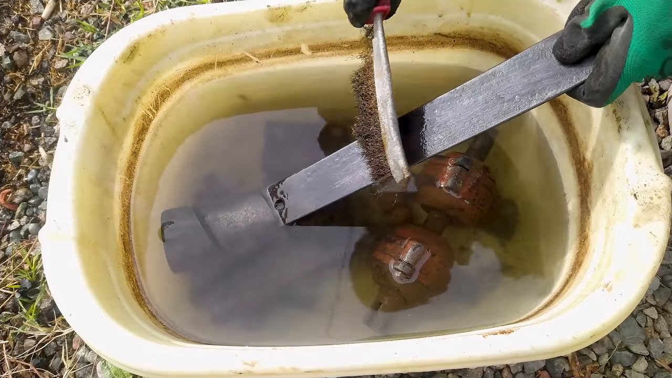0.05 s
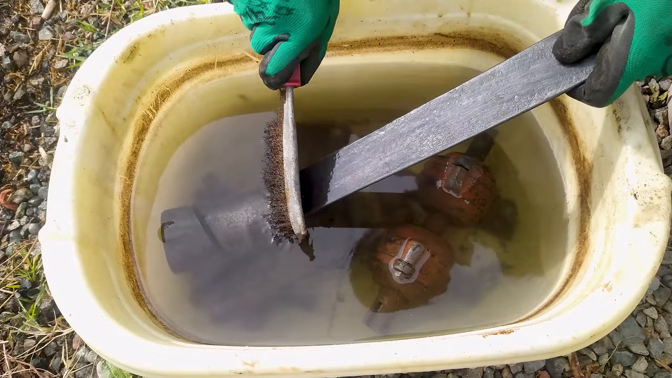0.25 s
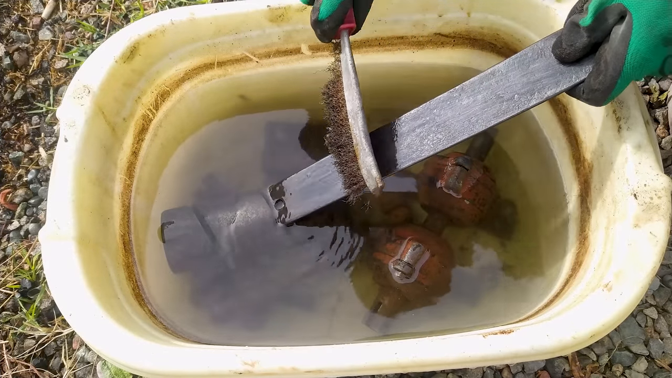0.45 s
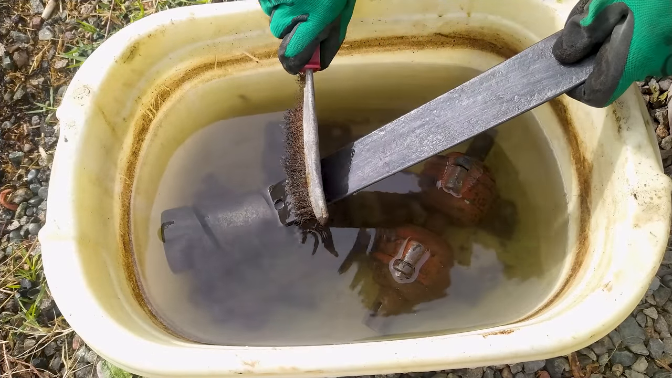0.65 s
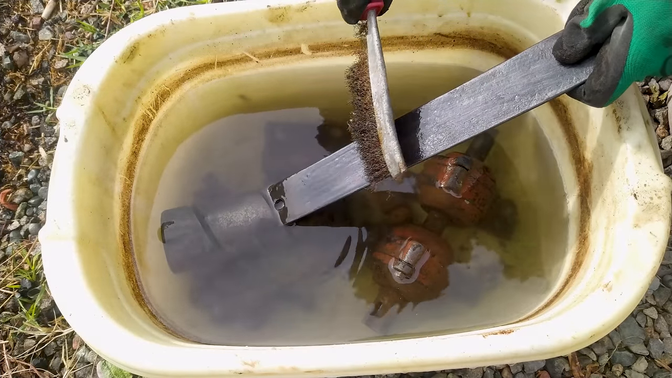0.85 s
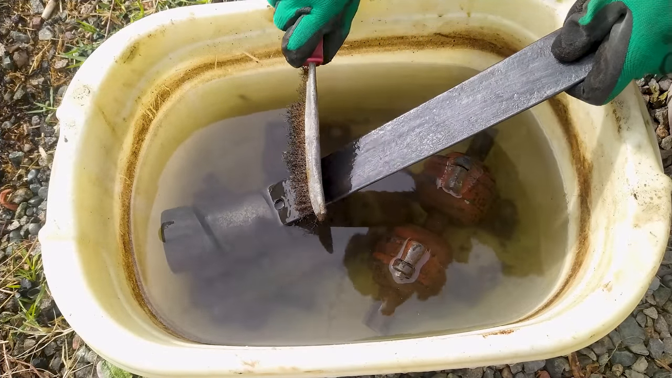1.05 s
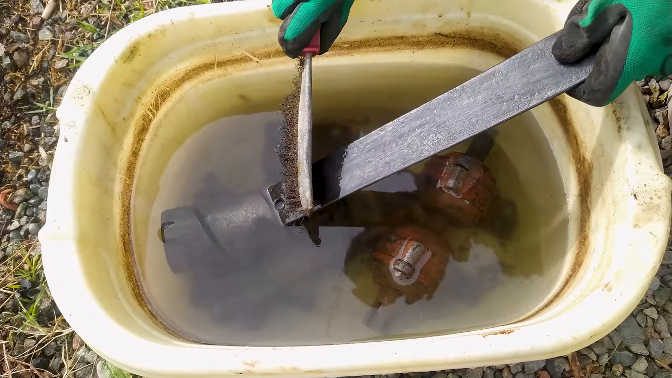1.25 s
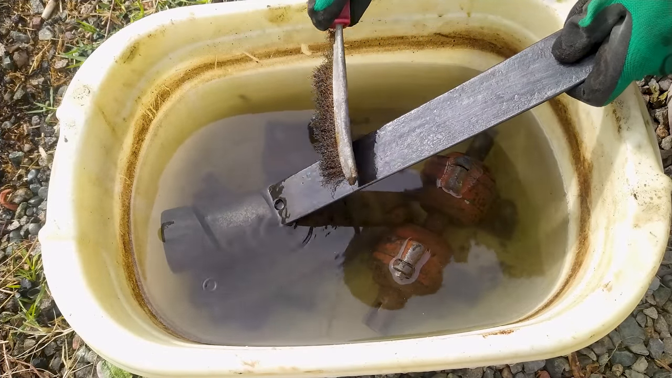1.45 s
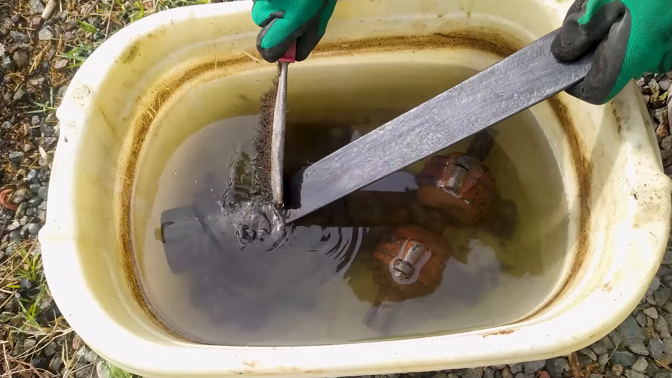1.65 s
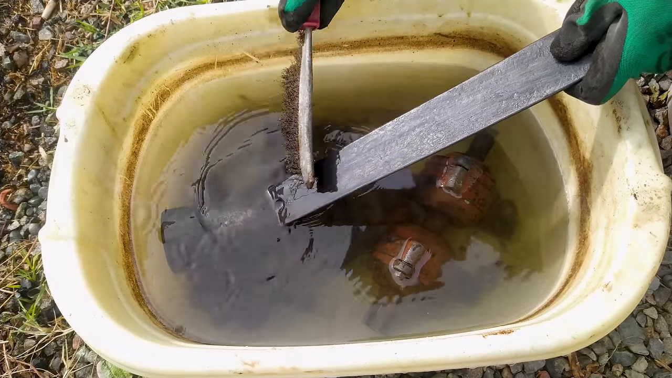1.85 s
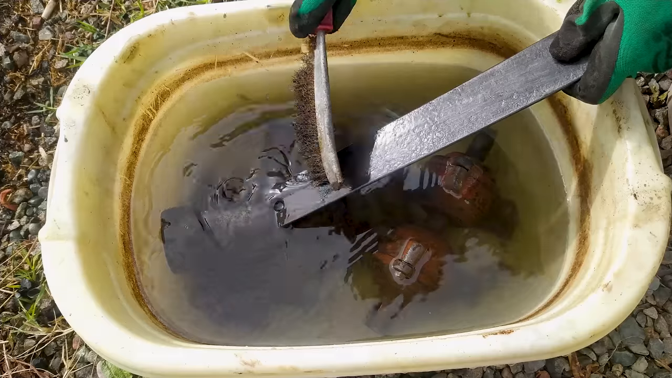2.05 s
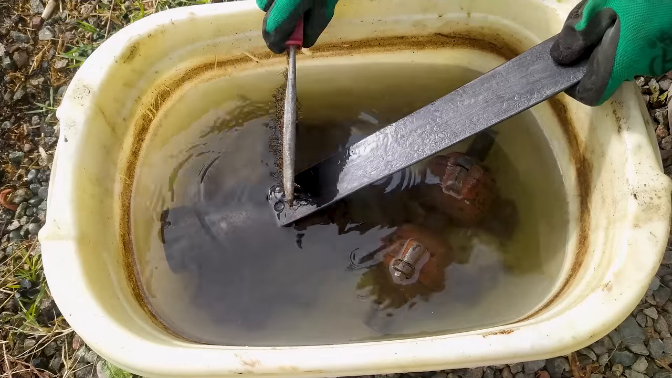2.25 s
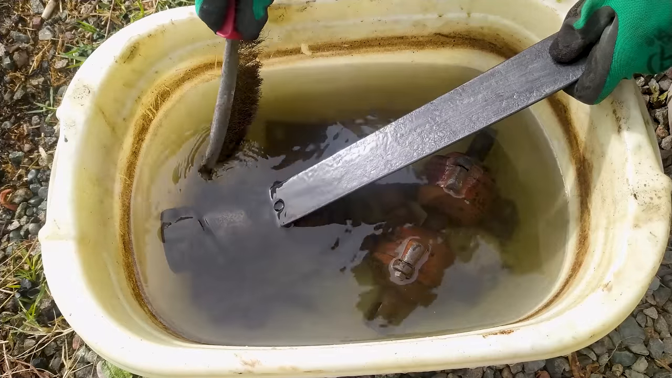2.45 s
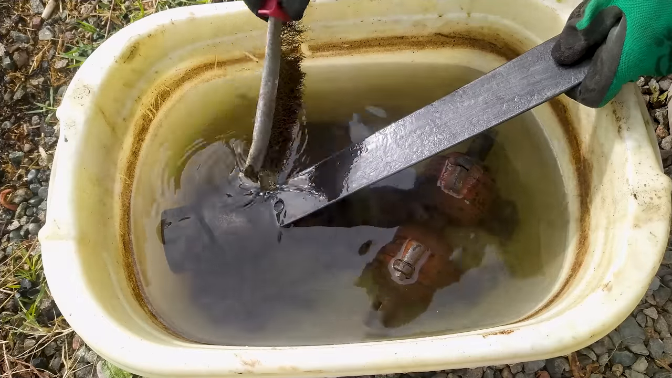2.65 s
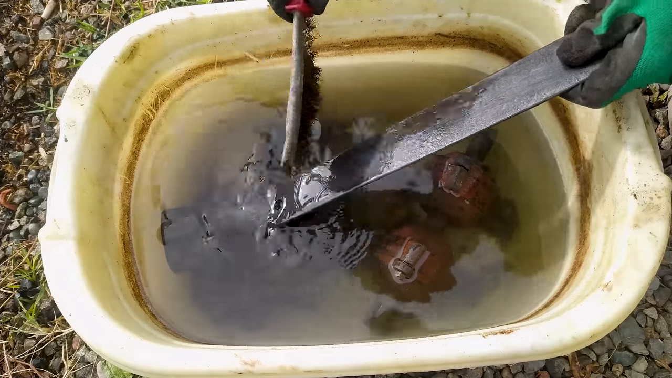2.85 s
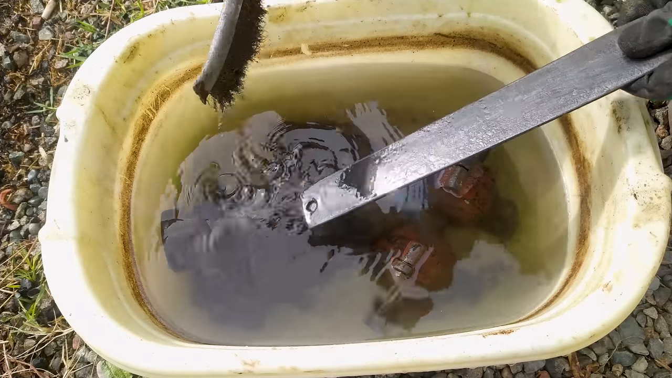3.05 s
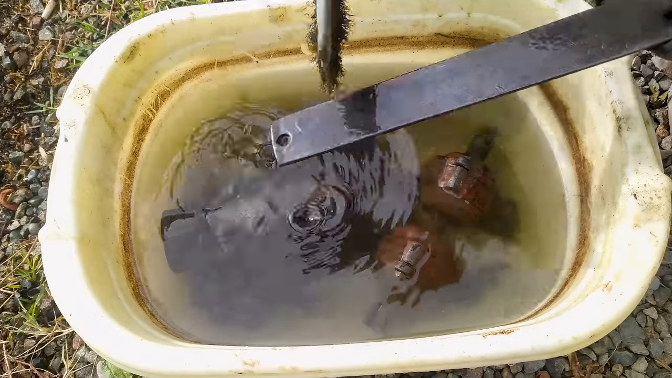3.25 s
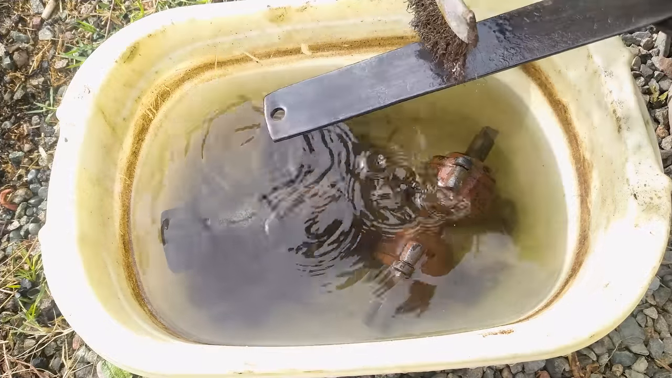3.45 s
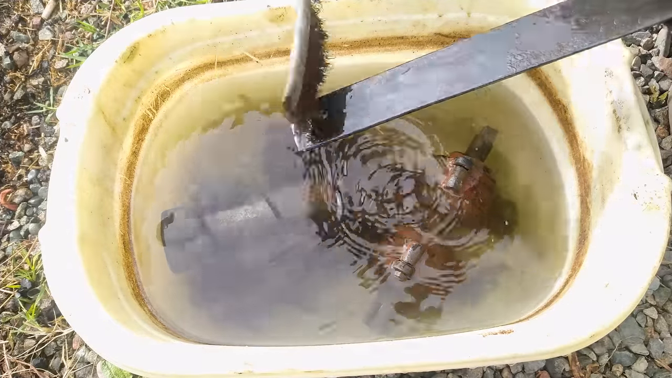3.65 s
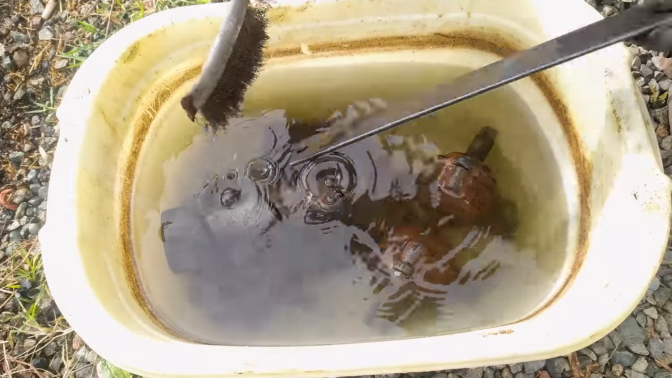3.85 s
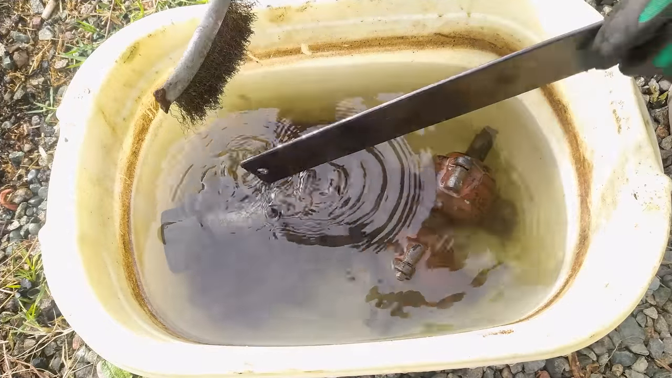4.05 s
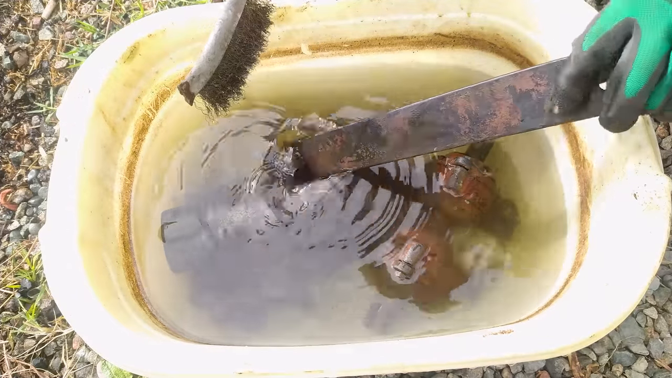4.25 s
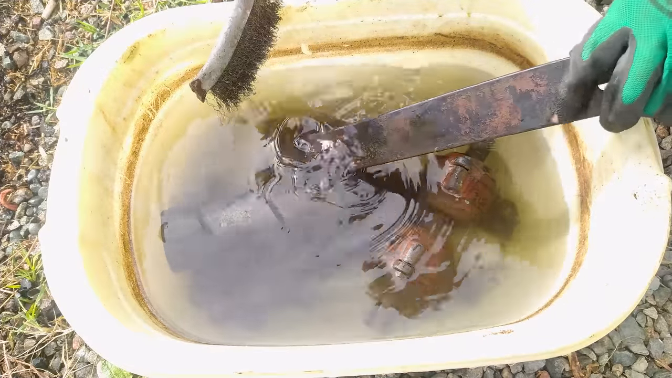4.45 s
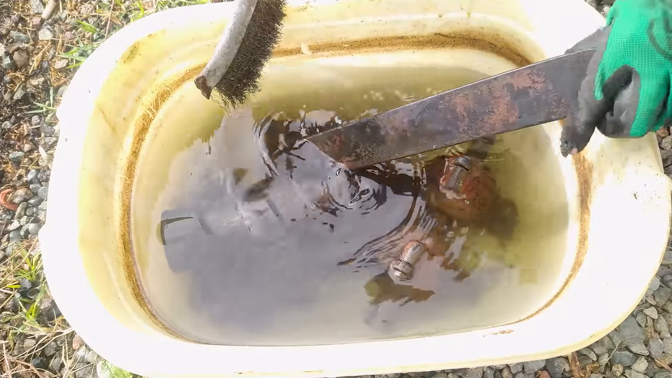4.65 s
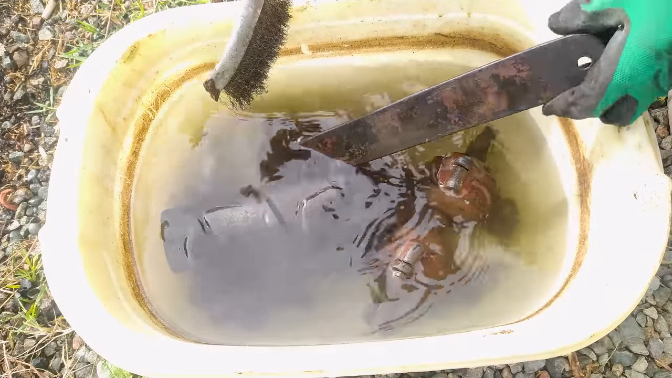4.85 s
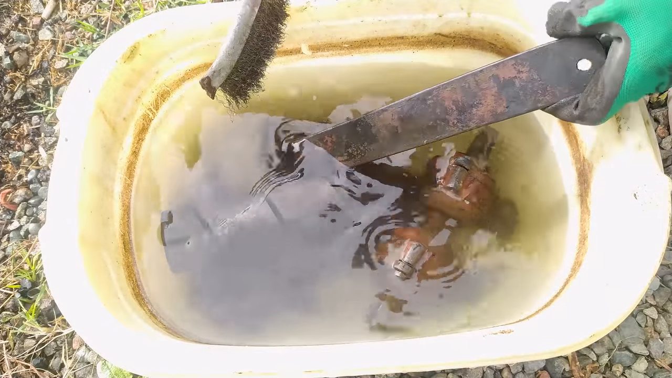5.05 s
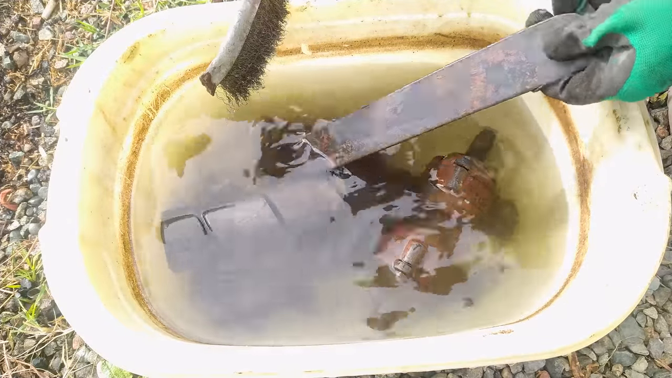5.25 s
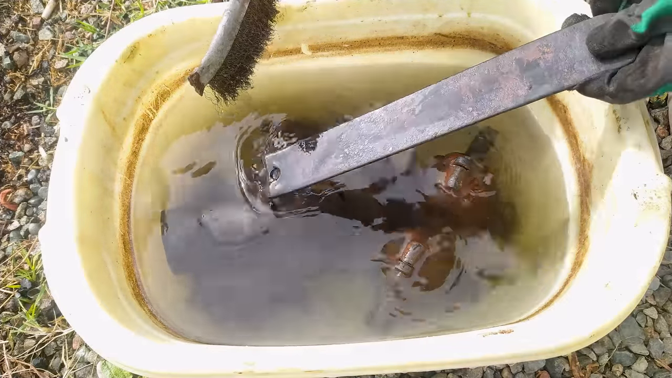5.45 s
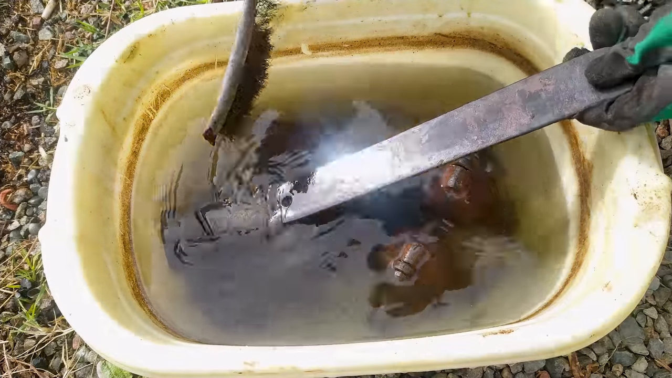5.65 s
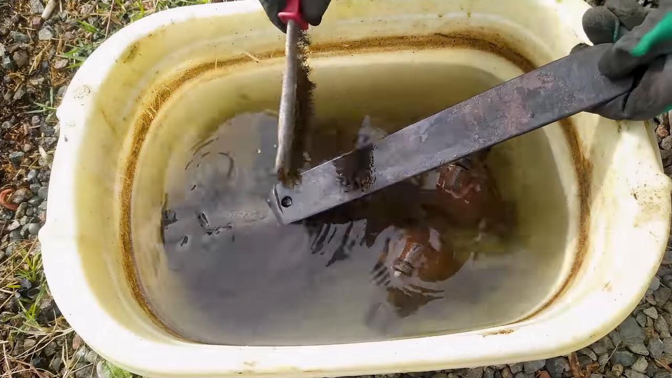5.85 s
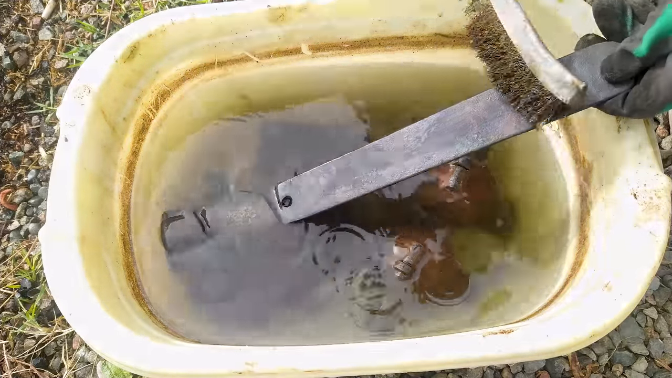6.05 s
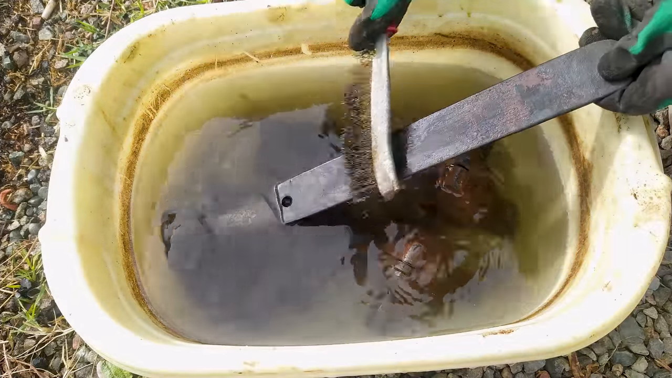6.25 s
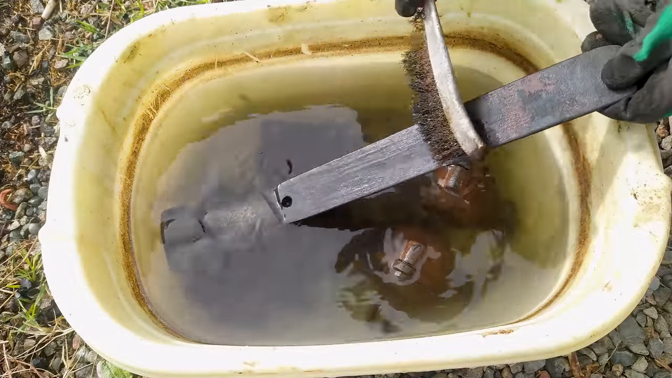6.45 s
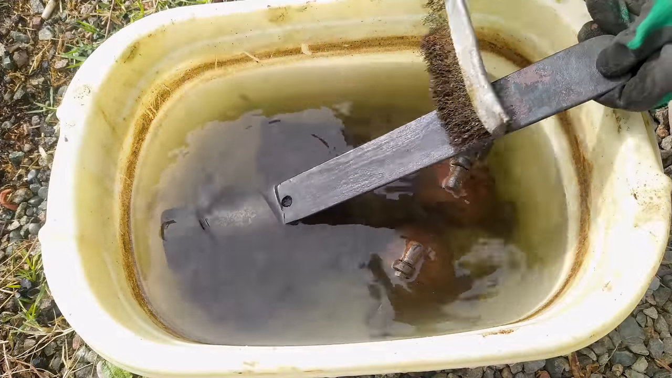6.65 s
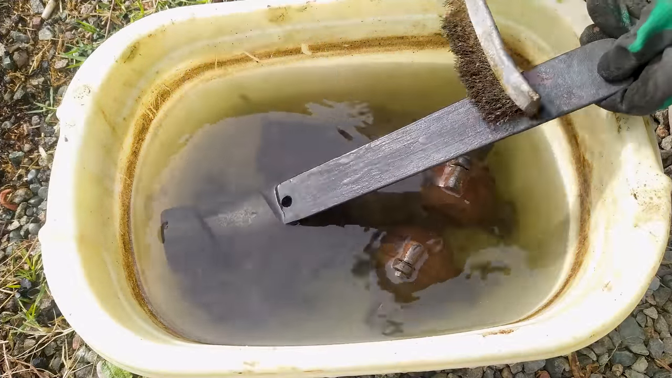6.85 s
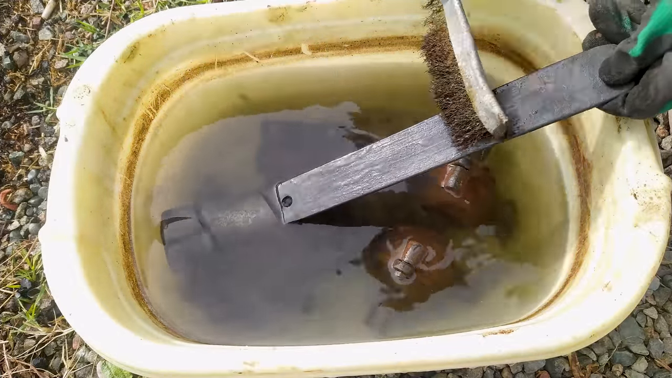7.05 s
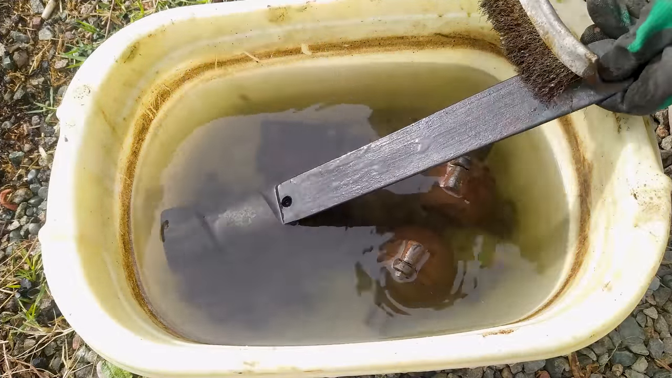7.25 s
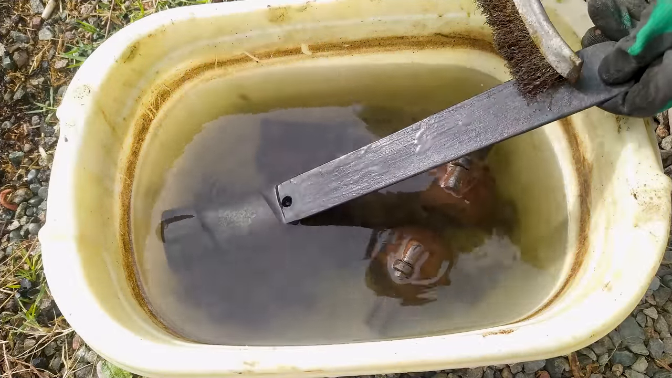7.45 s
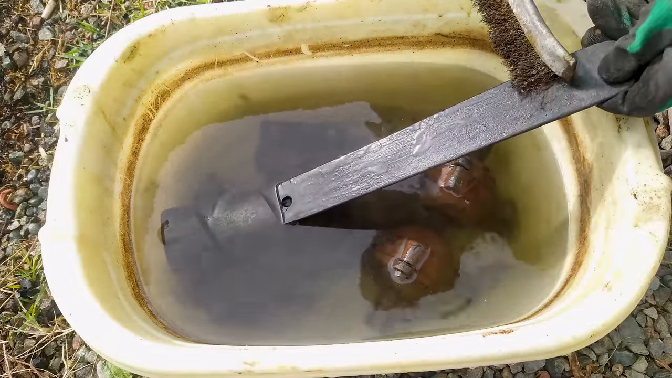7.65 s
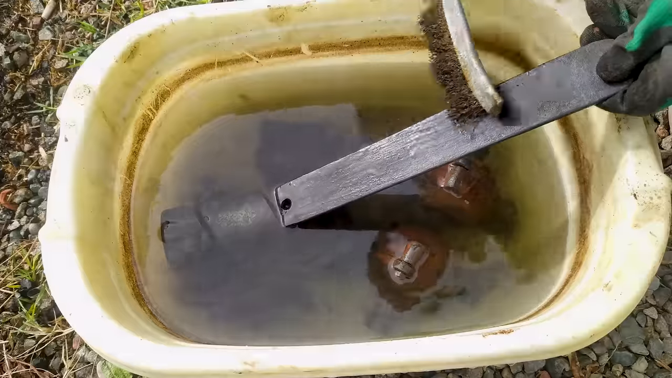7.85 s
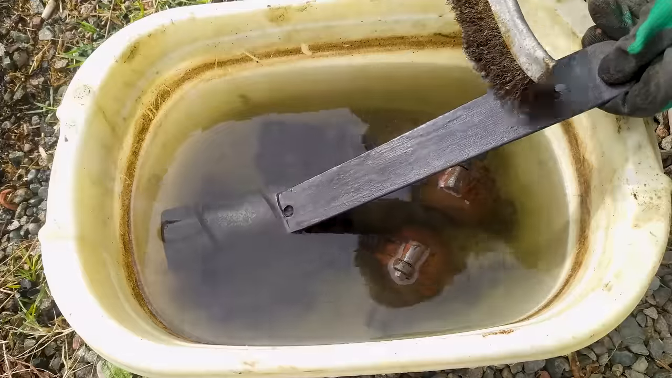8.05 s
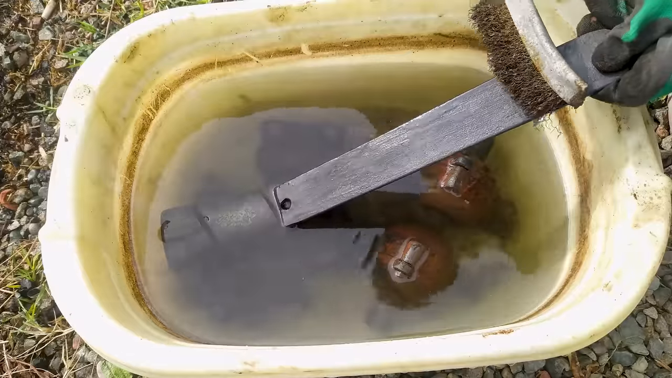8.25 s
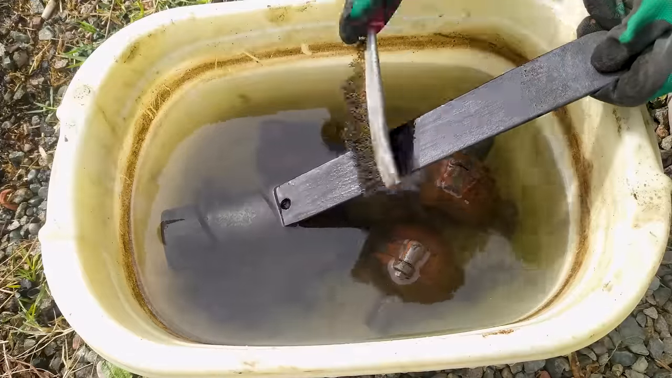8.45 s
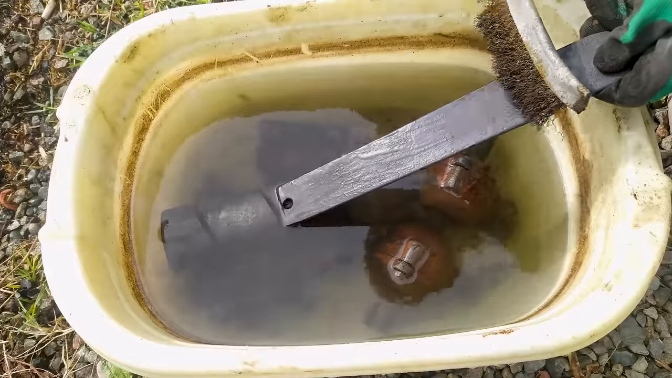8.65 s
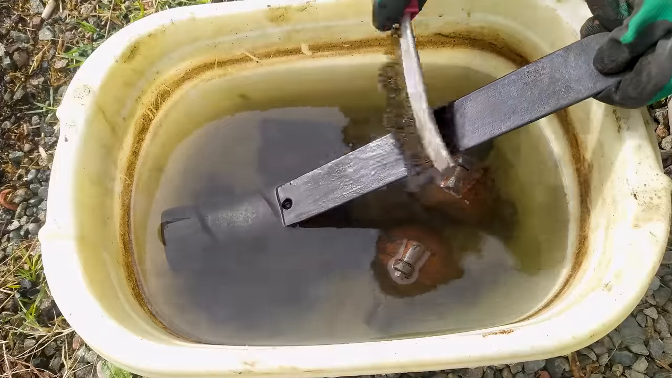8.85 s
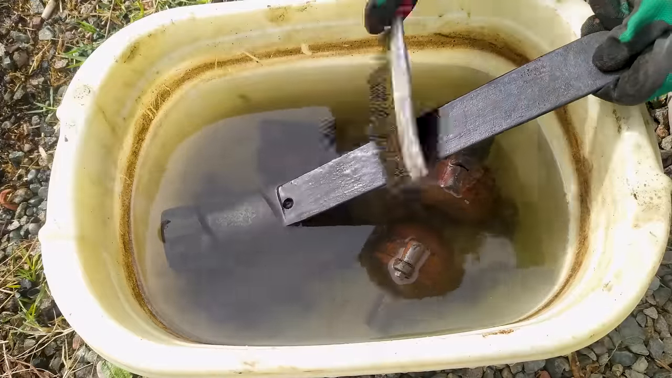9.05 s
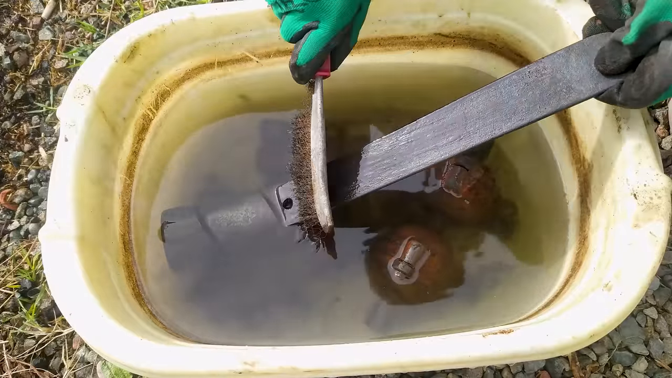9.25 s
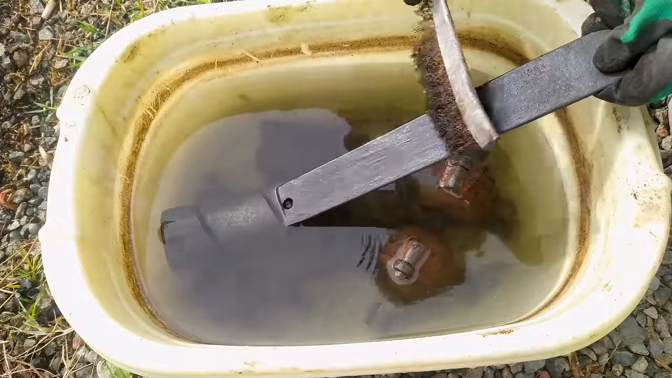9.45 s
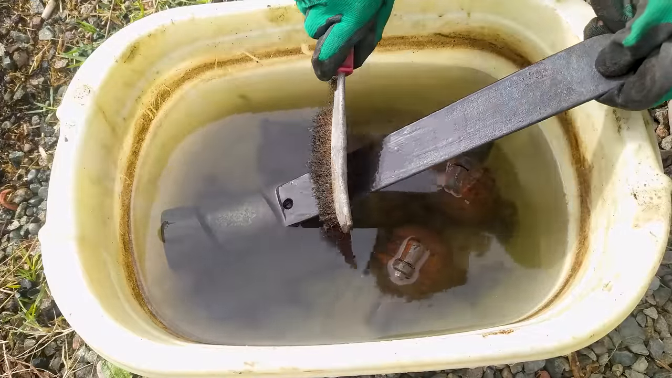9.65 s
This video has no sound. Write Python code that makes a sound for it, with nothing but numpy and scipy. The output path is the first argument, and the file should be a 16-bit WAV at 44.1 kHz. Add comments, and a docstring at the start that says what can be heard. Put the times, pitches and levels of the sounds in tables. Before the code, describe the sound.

Gritty metallic scrubbing, about five or six strokes a second, hissy and shimmering with steel ringing and hollow plastic drumming on the pushes. It fades to a pause with faint ticks and soft grazes; bright clanks, a spatter of spray, sloshing and bubbly plops follow as the bar is flipped. After another hard knock the scrubbing returns, tighter and more even. Close microphone outdoors, short tub echo.

```python
"""Outdoors, over a plastic tub of water, a wire brush scrubs a wet steel bar to and fro.
Wire tips catch and slip: shimmering noise hisses, resonances ring the bar and, loudest on the push, the tub drums.
Half way the bar is turned over: decaying modes knock, spray patters as swelling noise, light slides make the
bar sing, and the water gulps with gliding, dying sines. Quiet air noise lies beneath."""
import sys
import numpy as np
from scipy import signal
from scipy.fft import rfft, irfft, next_fast_len
from scipy.io import wavfile
from scipy.ndimage import uniform_filter1d, map_coordinates

SR = 44100
rng = np.random.default_rng(int(sys.argv[2]) if len(sys.argv) > 2 else 0)


def digitize_waveform(pressure):
    """Quantize a signal to 16-bit integers and store it at the path in sys.argv[1].

    Rows of a 2-D input are taken as channels; values are limited to [-1, 1].
    """
    field = np.atleast_2d(pressure).T
    bounded = np.clip(field, -1, 1)
    quanta = np.round(bounded * 32767).astype(np.int16)
    wavfile.write(sys.argv[1], SR, quanta)


N = 428211
TIME = np.arange(N) / SR

# Spectra. Each row: frequency in Hz, density in dB per Hz; only the shape counts, the layer sets the level.
AIR_COLOUR = [(30, -24.5), (165, -5.5), (1670, -22), (3870, -29.5), (7090, -25.5), (16000, -33.5)]
HISS_COLOUR = [(2500, -10.5), (7500, -6), (9300, 1.5), (11000, -15.5), (15000, -28.5)]
WATER_COLOUR = [(100, -15), (300, 5), (700, -11.5), (2200, -18.5), (6000, -30), (14000, -48)]
SPRAY_COLOUR = [(1000, -2.5), (3300, -15.5), (7000, 3), (14000, -16)]
CLATTER_COLOUR = [(50, -25), (150, -1), (500, -3.5), (2800, -0.5), (3350, -11), (3900, 8), (5800, 3.5),
                  (7000, 4), (9500, 6.5), (16000, -25)]
TUB_COLOUR = [(60, -41), (130, -52.5), (260, -4.5), (450, 4.5), (750, -4.5), (1040, 5.5), (1300, -8.5),
              (2400, 4), (5000, -10)]
WIRE_COLOUR = [(500, -35), (1100, -27.5), (2300, -9), (3150, -13.5), (3900, -2.5), (4750, -8.5), (6000, -5),
               (7100, 1.5), (9200, 7), (10200, -4), (12000, -63)]
FIZZ_COLOUR = [(5200, -28), (5650, -2), (6100, -8), (10200, 9.5), (10700, 22.5), (11800, -4.5), (12400, 15),
               (13200, 0), (16000, -31)]
# Stereo width of the noises. Each row: frequency in Hz, left-right likeness from 0 to 1.
LIKENESS = [(50, 0.33), (350, 0.88), (1100, 0.51), (5000, 0.06), (13000, 0.17)]
# Rise and fall of the faint hiss. Each row: time in seconds, level in dB before the layer's trim.
HISS_CURVE = [(0, -79), (2.6, -64.5), (4.2, -60.5), (5.5, -69), (5.75, -52.5), (6.1, -62), (8.1, -89)]

# The bar stirs the water. Each row: start in seconds, end in seconds, level in dB.
SWIRLS = [(4.292, 4.554, -53.5), (4.552, 4.818, -56), (4.785, 5.082, -56), (5.139, 5.39, -56.5)]
# Short gliding tones: water gulps, and a few low thuds. Each row: start in seconds, level in dB,
# first pitch in Hz, glide in octaves a second.
GLIDING_TONES = [(0.541, -21.5, 946, -42), (1.742, -30.5, 663, -9), (2.272, -28.5, 1270, -60),
                 (2.866, -41.5, 433, 5), (2.926, -39, 590, 6), (4.338, -8, 1900, 24), (4.392, -37, 440, -4),
                 (4.484, -37.5, 304, -10.5), (4.578, -40, 315, 4), (4.867, -24, 566, 16),
                 (4.869, -13.5, 2170, 9), (5.315, -38, 481, -4), (6.345, -46.5, 163, -11.5)]
# Spray falls back on the water. Each row: start in seconds, end in seconds, level in dB.
SPLASHES = [(4.335, 4.46, -49), (4.452, 4.495, -37)]

# Pitches of the bar's modes, in Hz.
BAR_HZ = [635, 1050, 1184, 1374, 1950, 2412, 2842, 4021, 5073, 5305, 6295, 6794, 7635, 8400, 8590, 9090,
          10110, 10685, 11470, 11806, 12360, 13650, 14270]
# Mode strengths, in the order of BAR_HZ. Each row: relative dB when excited by the brush, on the tip,
# on the edge, on the flat.
BAR_STRENGTHS = [(-64, -24.5, -41, -38), (-35.5, -23.5, -36, -33), (-57, -31.5, -22.5, -60),
                 (-40, -16.5, -37, -29.5), (-50, -20, -18.5, -38), (-35.5, -20, -33, -46),
                 (-31, -25.5, -16, -34), (-40, -22, -22.5, -46), (-17.5, -28, -39, -16.5),
                 (-48, -26.5, -20, -37), (-14, -16.5, -24, -17.5), (-38, -9.5, -12.5, -16),
                 (-10.5, -8.5, -24, -19.5), (-33.5, -16, -12.5, -23), (-11, -32, -26.5, -14.5),
                 (-5, -14, -15.5, -17.5), (-34, -36, -19.5, -24), (-13.5, -20.5, -36.5, -25.5),
                 (-22, -40, -43.5, -47.5), (-41.5, -43.5, -41, -21), (-18, -24, -32.5, -24.5),
                 (-27, -43, -48.5, -27), (-30, -33.5, -32.5, -38)]
# Names of the columns of BAR_STRENGTHS.
PLACES = ["brush", "tip", "edge", "flat"]
# The bar knocks in the tub. Each row: start in seconds, place, ring in dB, clatter in dB, clatter t60 in seconds,
# seconds until the hand or water chokes the ring, pitch rise while choked in Hz per second.
KNOCKS = [(2.862, "tip", -37.5, -38.5, 0.071, 0.021, 8), (2.915, "edge", -36, -43.5, .1, 0.02, 0),
          (4.235, "tip", -0.5, -19, 0.19, 0.079, -2), (4.307, "edge", 1, -10, 0.14, 0.028, 36000),
          (4.337, "edge", -12, -28.5, .07, .001, 24000), (4.866, "tip", -33, -28, 0.09, 0.0063, 0),
          (5.659, "flat", -0.5, -14, 0.075, 0.043, 0)]
# Light, sharp taps of metal on the bar. Each row: start in seconds, ring in dB.
TAPS = [(0.2329, -6.5), (1.6153, -6.5), (1.6251, -4), (2.006, -12.5), (2.563, -35.5), (3.583, -26.5)]

# The foot of the bar drags on the tub floor. Each row: start in seconds, end in seconds, level in dB.
DRAGS = [(7.91, 8.0, -47), (8.195, 8.3, -47.5)]
# Light slides that make the bar sing, by the glove or the tub. Each row: start in seconds, end in seconds,
# level in dB.
SLIDES = [(2.46, 2.64, -64.5), (4.31, 4.6, -57), (4.8, 4.91, -41.5), (4.965, 5.07, -53.5), (5.12, 5.3, -57)]
# The wires only graze the bar. Each row: start in seconds, end in seconds, level in dB.
GRAZES = [(3.37, 3.55, -56), (3.572, 3.782, -48), (6.05, 6.125, -54), (7.985, 8.08, -55.5),
          (8.195, 8.31, -54)]
# Strokes, each lasting until the next one or a rest. Each row: start in seconds, level in dB,
# sag of the pressure in dB a second.
STROKES = [(-0.02, -29.5, 15), (0.266, -35, 50), (0.469, -31.5, 56), (0.634, -35.5, 58), (0.846, -30.5, 45),
           (1.03, -37, -27), (1.214, -33.5, 100), (1.361, -34, 1), (1.522, -31, -26), (1.652, -34.5, 120),
           (1.838, -42.5, 29.0), (2.037, -43, 74), (2.182, -48.5, 14), (6.143, -33.5, -13),
           (6.381, -36, 93), (6.624, -32.5, -5.0), (6.791, -36.5, 102), (6.987, -33, -1.0),
           (7.152, -35.5, 46), (7.277, -35.0, 67), (7.4, -36, -26), (7.501, -37, 96.0), (7.616, -37.5, 21),
           (7.724, -36, 92), (7.845, -36.5, 99), (8.311, -32.5, 27), (8.499, -35.5, 81),
           (8.669, -31.5, -15), (8.836, -35.5, 73), (8.979, -33, 73), (9.255, -35.5, 34),
           (9.487, -33.0, 39), (9.668, -34.5, 30.0)]
# Moments when the scrubbing rests, in seconds.
RESTS = [2.363, 7.981, 9.8]
# Wire fizz and tub drumming change with the place of the brush. Each row: time in seconds,
# left minus right in dB, wire fizz in dB, tub drumming in dB (on top of the push or pull level).
SPOT = [(.2, 1.5, -11, 7), (1.7, 1.5, -17, 7.5), (2.1, -0.5, -10.5, 11), (6.2, 0.5, -4.5, 4.5),
        (9.7, 0.5, -6, 6)]

# Movement shapes: speed-up as a share of the movement, slow-down in seconds, sag in dB a second.
SWIRL, DRAG, SLIDE, GRAZE = (0.18, 0.065, 27), (0.52, 0.064, 68), (0.65, 0.11, 0), (0.15, 0.018, 0)
PUSH, PULL = (0.52, 0.042), (0.54, 0.036)  # a stroke brings its own sag
SPEED_POWER = 1.4  # friction grows as this power of the hand's speed

# Tub drumming, before SPOT: a push presses the bar into the tub and drums it harder.
PUSH_TUB_DB, PULL_TUB_DB, GRAZE_TUB_DB = -23, -33.5, -26
BEND_S, SNAP_S, BEND_DB = 0.016, 0.0028, -6  # on a push the wires first bend quietly, then snap into sliding
BACK_HZ, BACK_WIDTH_HZ = 1430, 200  # the brush's back hums
BACK_DB, BACK_GRAZE_DB = -30.5, -14.5  # hum under any contact, and extra hum when it rests lightly

BAR_T60, T60_SLOPE = 0.15, 0.17  # ring time at 1 kHz in seconds; it falls as this power of the pitch
LONG_HZ, LONG_T60 = 4021, 0.44  # one mode is barely damped by the grip (Hz, seconds)
TWIN_SPLIT = 0.0035  # a rubbed mode's pair lies this share below and above its pitch
RUB_WIDTH_HZ, RUB_Q = 15, 450  # width of a rubbed mode: this many Hz, plus its pitch over Q
LOAD_SWAY_S, LOAD_SWAYS_PER_S = 0.000244, 9  # the moving contact sways the pitches by tenths of a percent

CHOKED_SHARE = 0.056  # what is left of a choked ring
STIFFEN_BELOW_HZ = 2400  # modes well above this hardly bend
WAVER, WAVERS_PER_S = 0.007, 55  # pitch waver of a knocked mode, as a share of its pitch
HARD_HZ, DB_PER_OCTAVE = 14600, 13.5  # treble edge of a 0 dB knock; softer knocks are duller
TAP_HARD_HZ, TAP_CLATTER_DB = 13100, -17.5  # treble edge; clatter relative to the ring
EDGE_HZ = 15700  # upper band limit


def gain_of(db):
    """Turns dB into an amplitude factor."""
    return 10 ** (np.asarray(db) / 20)


def evened(x):
    """Scales to rms 1."""
    return x / np.sqrt(np.mean(x ** 2) + 1e-20)


def read(points, hz):
    """Reads a spectrum table on a log-frequency axis."""
    f, value = np.transpose(points)
    return np.interp(np.log(hz + 1), np.log(f), value)


def follow(curve):
    """Reads each column of a curve table at every sample."""
    s, *columns = np.transpose(curve)
    return np.array([np.interp(TIME, s, column) for column in columns])


def add(mix, s, sound):
    """Mixes a sound in at time s."""
    at = round(s * SR)
    part = mix[:, max(at, 0):]
    sound = sound[..., max(-at, 0):]
    part[:, :sound.shape[-1]] += sound[..., :part.shape[1]]


def drift(per_s):
    """A random wander of rms 1, gliding through this many random points a second."""
    knots = rng.standard_normal(N // 50)
    return evened(np.interp(TIME * per_s, np.arange(len(knots)), knots))


def noise(colour, size=N):
    """Coloured stereo noise of rms 1, its ears as alike as LIKENESS says, thinned in the deep bass."""
    padded = next_fast_len(size, True)
    hz = np.fft.rfftfreq(padded, 1 / SR)
    left, other = rfft(rng.standard_normal((2, padded)))
    same = np.clip(read(LIKENESS, hz), -1, 1)
    right = same * left + np.sqrt(1 - same ** 2) * other
    bass_cut = hz ** 2 / (hz ** 2 + 55 ** 2)
    coloured = np.array([left, right]) * gain_of(read(colour, hz)) * bass_cut
    return evened(irfft(coloured, padded)[:, :size])


def shimmer(x, depth_db=6.5):
    """Narrow metallic streaks come and go at a steady total level, as if tufts took turns to sing."""
    z = signal.stft(x, nperseg=1024)[2]
    streaks = rng.standard_normal(z.shape[1:])
    streaks = uniform_filter1d(streaks, size=4, axis=0)
    streaks = uniform_filter1d(streaks, size=10, axis=1)
    z = z * gain_of(depth_db * evened(streaks))
    steady = z / np.linalg.norm(z, axis=(0, 1))
    return evened(signal.istft(steady, nperseg=1024)[1][:, :N])


def resonance(drive, hz, width_hz):
    """One resonance; white noise keeps its level through it."""
    r, angle = np.exp(-np.pi * width_hz / SR), 2 * np.pi * hz / SR
    feed = [2 * np.sin(angle) * np.sqrt(1 - r)]
    return signal.lfilter(feed, [1, -2 * r * np.cos(angle), r * r], drive + 1e-18)


def sweep(start, end, level_db, shape):
    """Strength of one rubbing movement: the hand speeds up from rest, sags, and slows to rest."""
    attack_share, release_s, sag_db_per_s = shape
    length = end - start
    t = np.arange(0, length, 1 / SR)
    ramps = np.clip([t / (attack_share * length), (length - t) / release_s], 0, 1)
    speed = np.sin(np.pi / 2 * ramps).prod(0)
    pressure = gain_of(level_db - sag_db_per_s * (t - length / 2))
    return pressure * speed ** SPEED_POWER


def movements(rows, shape):
    """Strength over time of a table of like movements."""
    force = np.zeros((1, N))
    for start, end, level_db in rows:
        add(force, start, sweep(start, end, level_db, shape))
    return force


def bar_modes(place):
    """Pitches, decay times and strengths of the bar's modes when excited at one place."""
    hz = np.array(BAR_HZ)
    t60 = BAR_T60 * (hz / 1000) ** -T60_SLOPE
    t60[np.argmin(abs(hz - LONG_HZ))] = LONG_T60
    return hz, t60, gain_of(np.transpose(BAR_STRENGTHS)[PLACES.index(place)])


def rubbed_bar(force, place, wander_db):
    """Friction keeps modes ringing as close pairs, which trade strength and sway as the contact moves."""
    drives = force * rng.standard_normal((2, 2, N))
    out = np.zeros((2, N))
    modes_hz, _, weights = bar_modes(place)
    moments = np.arange(0, N / SR, 1 / 20)
    wander = wander_db * rng.standard_normal((2, len(weights), len(moments)))
    swells = weights[:, None] * gain_of(wander)
    swells /= np.sqrt((swells ** 2).sum((0, 1)))  # the total power stays with the hand
    for split, drive, family in zip([1 - TWIN_SPLIT, 1 + TWIN_SPLIT], drives, swells):
        for hz, swell in zip(modes_hz * split, family):
            out += np.interp(TIME, moments, swell) * resonance(drive, hz, RUB_WIDTH_HZ + hz / RUB_Q)
    swayed = (TIME + LOAD_SWAY_S * drift(LOAD_SWAYS_PER_S)) * SR
    return np.array([map_coordinates(ear, [swayed], order=3) for ear in out])


def background():
    """Quiet outdoor air with a faint hiss that swells and sinks."""
    air = gain_of(-67.5 + 0.46 * drift(4.1)) * noise(AIR_COLOUR)
    hiss = gain_of(follow(HISS_CURVE) - 4.0) * noise(HISS_COLOUR)
    return air + hiss


def yard(x, near_t60=0.16, near_db=-13, far_t60=0.2, far_db=-31):
    """Decaying noise echoes: a short ring inside the tub and a weaker, longer one from the surroundings."""
    t = np.arange(SR // 2) / SR
    echo = 0
    for db, t60 in [(near_db, near_t60), (far_db, far_t60)]:
        tail = noise([(500, 10.0), (2500, 1), (12000, -11.0)], size=len(t)) * gain_of(-60 * t / t60)
        echo = echo + gain_of(db) * tail / np.linalg.norm(tail[0])
    return signal.oaconvolve(x, echo, axes=1)[:, :N]


def gliding_tone(hz, glide, rise_s=0.0043, ring_cycles=20):
    """A dying sine gliding in octaves a second; higher tones ring shorter, as small bubbles do."""
    t = np.arange(SR // 8) / SR
    turns = np.cumsum(hz * 2 ** (glide * t)) / SR
    decay = gain_of(-60 * t * hz / ring_cycles)
    return decay * (1 - np.exp(-t / rise_s)) * np.sin(2 * np.pi * turns)


def water(drops_per_s=220, drops_db=2):
    """Sloshing and small droplets round the moving bar, and short gliding tones: gulps and a few low thuds."""
    start, end = SWIRLS[0][0], SWIRLS[-1][1]
    drops = np.zeros((1, N))
    for when, pitch, size in rng.random((int(drops_per_s * (end - start)), 3)):
        droplet = -np.log(1 - size) * gliding_tone(450 * 10 ** pitch, 2.5)
        add(drops, start + when * (end - start), droplet)
    slosh = evened(gain_of(5.2 * drift(35))) * noise(WATER_COLOUR)
    out = movements(SWIRLS, SWIRL) * (slosh + gain_of(drops_db) * drops)
    for s, db, hz, glide in GLIDING_TONES:
        add(out, s, gain_of(db) * gliding_tone(hz, glide))
    return out


def splash(patter_db=5, drops_per_s=400):
    """Fine spray patters back on the water: bright noise with a fast random flutter."""
    patter = evened(gain_of(patter_db * drift(drops_per_s)))
    return movements(SPLASHES, SWIRL) * patter * shimmer(noise(SPRAY_COLOUR))


def blow(place, ring_db, hard_hz, clatter_db, clatter_t60, free_s, bend_hz_per_s,
         choke_s=0.013, rise_s=0.00066, crack_share=0.24, crack_hz=2600):
    """A blow cracks, rings the bar and rattles the tub, until the hand or the water chokes it."""
    t = np.arange(SR // 3) / SR
    hz, t60, strength = np.array(bar_modes(place))[..., None]
    choked_s = np.maximum(t - free_s, 0)
    free = np.exp(-choked_s / choke_s)
    # pressed against the tub, the bar stiffens: its low modes bend as they die
    bend_hz = bend_hz_per_s * choked_s * (free > CHOKED_SHARE / 2) / (1 + (hz / STIFFEN_BELOW_HZ) ** 4)
    # it also skids as it rings, so each mode wavers in pitch
    knots = rng.standard_normal((len(hz), 20))
    waver = np.array([np.interp(t * WAVERS_PER_S, np.arange(len(k)), k) for k in knots])
    bend_hz = bend_hz + WAVER * np.minimum(hz, LONG_HZ) * waver  # high modes waver no wider than LONG_HZ
    phase = 2 * np.pi * (np.cumsum(hz + bend_hz, axis=1) / SR + rng.random(hz.shape))
    lag = np.pi / 2 * np.minimum(hz / 2000, 1)  # short waves reach the two ears out of step
    size = strength * gain_of(ring_db - 60 * t / t60)
    ring = np.array([(size * np.sin(phase)).sum(0), (size * np.sin(phase - lag)).sum(0)])

    burst = gain_of(clatter_db) * noise(CLATTER_COLOUR, size=len(t))
    rattle = signal.lfilter(*signal.butter(2, crack_hz, "low", fs=SR), burst)
    crack = signal.lfilter(*signal.butter(2, crack_hz, "high", fs=SR), burst)
    fall_db = -60 * t / clatter_t60
    clatter = rattle * gain_of(fall_db) - crack * gain_of(fall_db / crack_share)  # the crack dies first

    held = np.maximum(free, CHOKED_SHARE) * (1 - np.exp(-t / rise_s))
    return signal.lfilter(*signal.butter(2, min(hard_hz, EDGE_HZ), fs=SR), (ring + clatter) * held)


def knocks():
    """The bar knocks in the tub, brighter the harder it lands; metal taps it lightly."""
    out = np.zeros((2, N))
    for s, place, ring_db, clatter_db, clatter_t60, free_s, bend in KNOCKS:
        hard_hz = HARD_HZ * 2 ** (ring_db / DB_PER_OCTAVE)
        add(out, s, blow(place, ring_db, hard_hz, clatter_db, clatter_t60, free_s, bend))
    for s, ring_db in TAPS:  # the brush chokes a tap at once
        tap = blow("brush", ring_db, TAP_HARD_HZ, ring_db + TAP_CLATTER_DB, clatter_t60=0.014,
                   free_s=0.00043, bend_hz_per_s=0, choke_s=0.002)
        add(out, s, tap)
    return out


def foot(dull_hz=2600, ring_db=4, tub_db=-1.0):
    """The bar's lower end drags under water: a hollow scrape of the tub and the bar's low modes."""
    force = movements(DRAGS, DRAG)
    ring = gain_of(ring_db) * rubbed_bar(force, "tip", wander_db=2)
    scrape = gain_of(tub_db) * force * noise(TUB_COLOUR)
    return signal.lfilter(*signal.butter(2, dull_hz, fs=SR), ring + scrape)


def light_slides(judder_db=3, judder_per_s=110):
    """The glove or the tub judders lightly along the steel and makes it sing faintly."""
    force = movements(SLIDES, SLIDE) * evened(gain_of(judder_db * drift(judder_per_s)))
    singing = gain_of(2.0) * rubbed_bar(force, "edge", wander_db=8.0)
    return singing + gain_of(-1) * force * noise(WIRE_COLOUR)


def whistling_mode():
    """A high mode of the bar whistles thinly under the grazing wires: noise through one narrow resonance."""
    force = movements([(3.58, 3.765, -54)], GRAZE)  # start s, end s, level dB
    return resonance(force * rng.standard_normal((2, N)), 11850, RUB_WIDTH_HZ)


def flicks(per_s=260):
    """Single wires snag on the rust and spring free, each with a tiny click of its own size."""
    snags = rng.random(N) < per_s / SR
    size = gain_of(3 * np.minimum(rng.exponential(1, N), 4)) * snags
    click = noise(WIRE_COLOUR, size=256) * np.exp(-np.arange(256) / 20)
    return evened(signal.oaconvolve(size[None], click, axes=1)[:, :N])


def scrubbing(overlap_s=0.00069):
    """Force on the bar and on the tub: pushes and pulls alternate, with a push first after each rest."""
    force = movements(GRAZES, GRAZE)
    drumming = force * gain_of(GRAZE_TUB_DB)
    turns = [row[0] for row in STROKES] + RESTS
    pushing = True
    for start, level_db, sag in STROKES:
        end = min(s for s in turns if s > start)
        shape, tub_db, bend_db = (PUSH, PUSH_TUB_DB, BEND_DB) if pushing else (PULL, PULL_TUB_DB, 0)
        stroke = sweep(start - overlap_s, end + overlap_s, level_db, (*shape, sag))
        t = np.arange(len(stroke)) / SR
        stroke *= gain_of(np.interp(t, [BEND_S, BEND_S + SNAP_S], [bend_db, 0]))
        add(force, start - overlap_s, stroke)
        add(drumming, start - overlap_s, stroke * gain_of(tub_db))
        pushing = end in RESTS or not pushing
    return force, drumming


def brush(judder_db=1.57, judder_per_s=110, flicks_db=-8):
    """Wires catch and let go under each stroke, feeding hiss, fizz, the bar, the brush's back and the tub."""
    force, drumming = scrubbing()
    left_db, fizz_db, tub_db = follow(SPOT)
    lean_db = left_db * np.array([[.5], [-.5]])
    grain = evened(gain_of(judder_db * drift(judder_per_s)))

    wires = gain_of(-0.5) * shimmer(noise(WIRE_COLOUR))
    wires = wires + gain_of(fizz_db) * shimmer(noise(FIZZ_COLOUR))
    wires = wires + gain_of(flicks_db) * flicks()
    bar = gain_of(-2) * rubbed_bar(force * grain, "brush", wander_db=5.5)
    hum = gain_of(BACK_DB) * force + gain_of(BACK_GRAZE_DB) * movements(GRAZES, GRAZE)
    back = resonance(hum * grain * rng.standard_normal((2, N)), BACK_HZ, BACK_WIDTH_HZ)
    tub = drumming * gain_of(tub_db) * grain * noise(TUB_COLOUR)
    tub = tub * gain_of([[.3], [2.7]])  # dB at left and right: the tub leans right
    return (force * grain * wires + bar) * gain_of(lean_db) + back + tub


def scene():
    """Everything in the tub, its echo and the outdoor air."""
    dry = water() + splash() + knocks() + foot() + light_slides() + whistling_mode() + brush()
    return background() + dry + yard(dry)


def record(dry):
    """A small microphone without deep bass; the highest peaks clip; then the band limit."""
    thin = signal.lfilter(*signal.butter(2, 85, "high", fs=SR), dry)
    clipped = np.clip(thin, -.85, .85)
    band_limit = signal.firwin(301, EDGE_HZ, window=("kaiser", 9), fs=SR)
    return signal.oaconvolve(clipped, band_limit[None], "same")


dry = scene()
out = record(dry)
digitize_waveform(out)
```